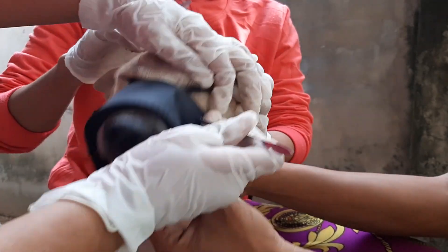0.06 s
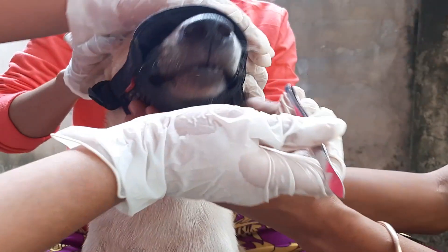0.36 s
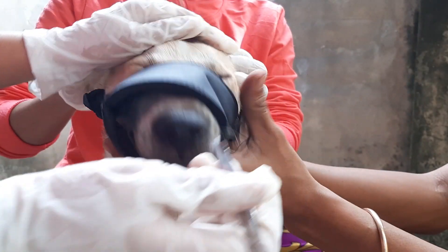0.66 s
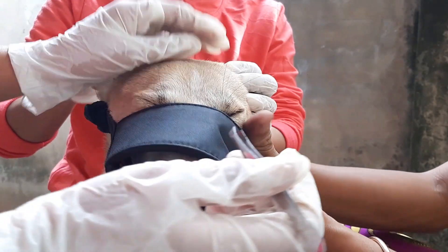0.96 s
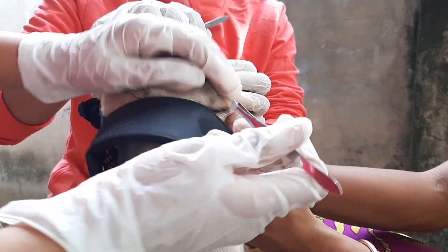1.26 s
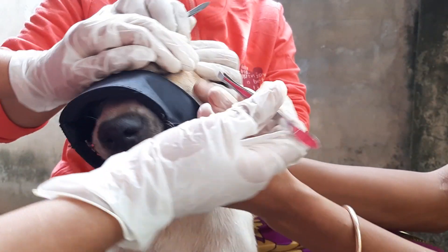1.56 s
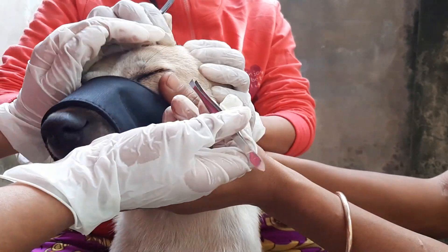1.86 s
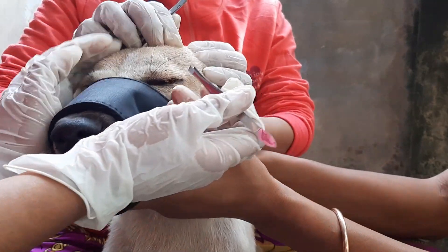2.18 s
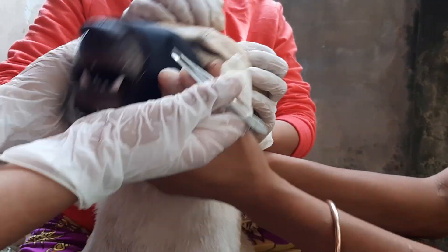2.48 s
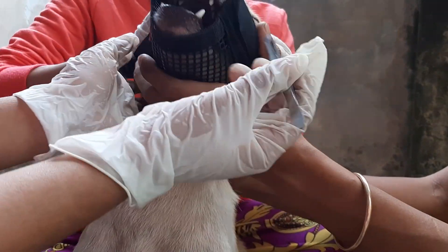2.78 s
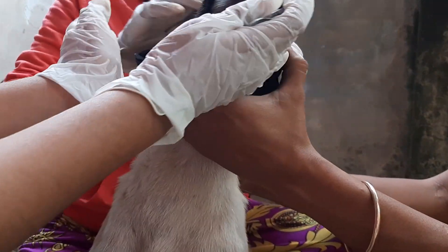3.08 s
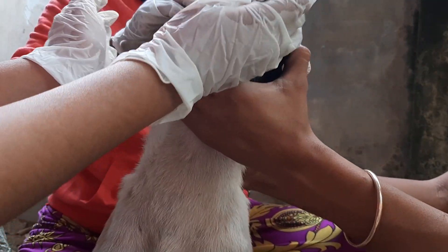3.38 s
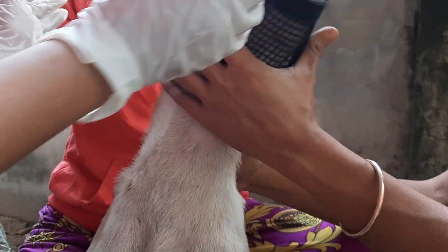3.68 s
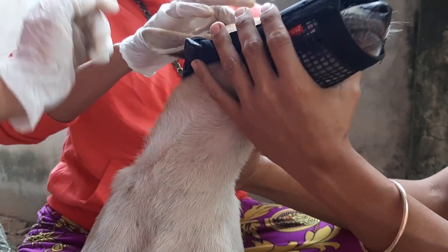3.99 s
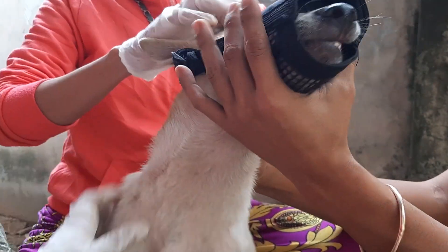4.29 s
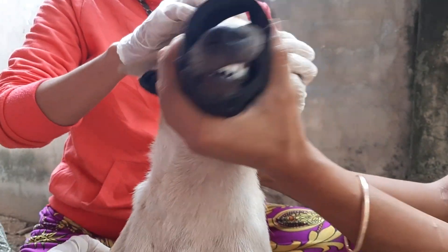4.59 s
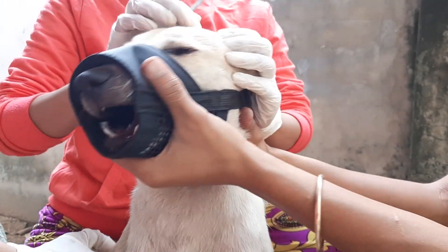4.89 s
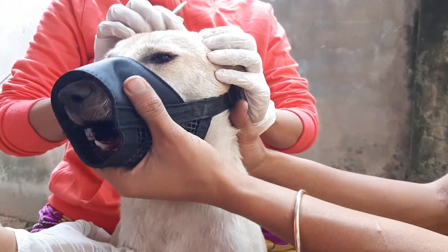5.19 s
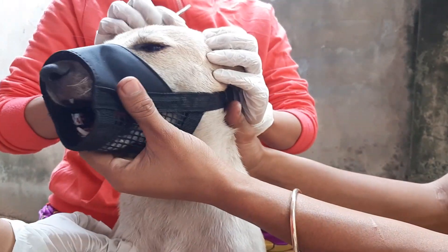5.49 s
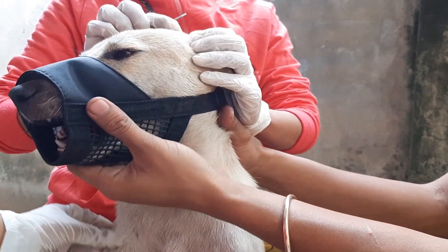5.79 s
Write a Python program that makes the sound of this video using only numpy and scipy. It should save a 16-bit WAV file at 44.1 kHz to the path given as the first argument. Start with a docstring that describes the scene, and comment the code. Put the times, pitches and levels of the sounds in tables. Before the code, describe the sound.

A muzzled dog is heard close up in a small, hard-walled room with a steady low hum. It starts with faint, thin, very high whistling whines and soft nose breaths, which build from about 1.3 seconds. At 1.9 seconds comes a loud, high yelp, followed by a gasp and a snort. Around 2.4 seconds a brief rough growl breaks into a second, lower yelp. Short snorts flutter inside the muzzle near 2.8 seconds. The whines return at 3.4 seconds among hissing breaths, peak near 4.3 and fade by 5, leaving a few last snorts and breaths until almost 6 seconds. Latex gloves rub on fur and mesh with a faint crackle at the start, around 2.5 to 3 seconds and near 4.5. A few tiny clicks of tweezers and muzzle are scattered throughout.

```python
"""A muzzled dog is held close to a phone in a small, hard-walled, humming room while gloved hands pick
ticks from its head. Gloves rub on fur and mesh, small clicks sound, and the dog whines in thin nasal
whistles. Its vocal folds yelp at 1.9 s, then break from a growl into a second, lower yelp at 2.4 s.
Gasps and snorts rush into the muzzle around the cries and after them. The whines return at 3.4 s,
peak near 4.3 s and give way to a few last snorts and breaths."""
import sys
import numpy as np
from scipy import signal
from scipy.fft import rfft, irfft, next_fast_len
from scipy.io import wavfile
from scipy.ndimage import uniform_filter1d

SR = 44100
rng = np.random.default_rng(int(sys.argv[2]) if len(sys.argv) > 2 else 0)


def generate_wav(sig):
    """Save sig (samples, or channels by samples) to the path in sys.argv[1] as 16-bit PCM at SR."""
    pcm = np.round(np.clip(np.atleast_2d(sig).T, -1, 1) * 32767).astype(np.int16)
    wavfile.write(sys.argv[1], SR, pcm)


N = 257984
TIME = np.arange(N) / SR
FREQS = np.fft.rfftfreq(N, 1 / SR)


def whine_arches(attack_s=0.017, release_s=0.012):
    """Whine pitch and strength: each scoops to its crest, then slides off as the air runs out."""
    # (start [s], length [s], crest position [0-1], start pitch [Hz], crest pitch [Hz], end pitch [Hz],
    #  bend [1 even slide, 4 late plunge], relative start level [dB], relative end level [dB])
    arches = [ (.115, 0.081, .26, 4930, 5760, 5610, 1.2, -47, -51.5),
              (.64, 0.071, 0.76, 5350, 5460, 5500, 2.4, -42, -40.5),
              (1.305, .085, .25, 5500, 5520, 5424, 1, -55, -61),
              (1.388, 0.15, 0.16, 5780, 5980, 5720, 1.27, -49.5, -36.5),
              (1.553, 0.13, .25, 5920, 5920, 5530, 1.3, -46.5, -31.5),
              (1.675, 0.062, 0.13, 5640, 5560, 5403, 1.53, -30, -17.5),
              (1.757, 0.12, 0.53, 5660, 5760, 5340, 1.2, -36.5, -30.5),
              (1.91, 0.068, 1, 5300, 5500, 5550, 1, -31.5, -40.5),
              (1.98, 0.15, .88, 5560, 5650, 5540, 3.1, -46.5, -38.5),
              (2.432, 0.026, 0.62, 5320, 5620, 5600, 2.4, -33, -31),
              (2.59, 0.032, 0.28, 5440, 5460, 5400, 1, -36, -44),
              (3.425, 0.058, 0.87, 5470, 5560, 5600, 1.04, -61, -30),
              (3.475, 0.13, 0.31, 5420, 5680, 5070, 2.4, -33, -28.5),
              (3.83, 0.049, 1, 5300, 5680, 5660, 1.7, -33.5, -35.5),
              (3.897, .065, 0.14, 5670, 5560, 5320, 0.96, -35, -43),
              (3.95, 0.096, .5, 5600, 5530, 5520, 1, -47, -41),
              (4.015, .318, 0.7, 5500, 5840, 5080, 4.8, -32.5, -21.5),
              (4.6, 0.061, .8, 5550, 5960, 6000, 1.8, -51, -41.5),
              (4.735, .115, .15, 6170, 6020, 5700, 1.5, -49.5, -52),
              (4.838, 0.12, 0.57, 5500, 5750, 5200, 1.6, -39, -40.5),
              (5.229, 0.031, 0.29, 3960, 4036, 3890, 1.16, -34.5, -39)]
    pitch_hz, strength = np.full(N, float(arches[0][3])), np.zeros(N)
    for start, length, share, start_hz, crest_hz, end_hz, bend, start_db, end_db in arches:
        crest, end = start + share * length, start + length
        scoop_hz = (start_hz - crest_hz) * (1 - progress(start, crest)) ** 2
        slide_hz = (end_hz - crest_hz) * progress(crest, end) ** bend
        pitch_hz = np.where(TIME >= start, crest_hz + scoop_hz + slide_hz, pitch_hz)
        swell = envelope(start, end, attack_s, release_s, end_db - start_db)
        strength += undb((start_db + end_db) / 2) * swell
    return uniform_filter1d(pitch_hz, size=200), strength


def whines(jitter=0.0017, waver=0.0014, squeak=0.02, flutter_db=1.5, octave_db=-32, gain_db=1):
    """A nearly pure whistle high in the nose; its faint octave grows with the root of its strength."""
    # breaks into a rough squeak: (start [s], length [s])
    breaks = [(1.829, 0.035), (2.438, .022)]
    hz, strength = whine_arches()
    broken = sum(envelope(s, s + length, attack_s=0.012, release_s=0.012) for s, length in breaks)
    detune = jitter * wander(120) + waver * wander(35) + squeak * broken * wander(400)
    phase = 2 * np.pi * np.cumsum(hz * (1 + detune)) / SR
    strength = np.sqrt(2) * strength * undb(gain_db + flutter_db * wander(60))
    whistle = place(strength * np.sin(phase), lead_ms=0.13, pan_db=4)
    octave = np.sqrt(strength) * undb(octave_db + wander(23)) * np.sin(2 * phase)
    return whistle + place(octave, lead_ms=0.14, pan_db=-5)


def yelps(jitter=0.0047, room_flutter_db=0.96, rasp_db=-22, core_gain_db=1, upper_gain_db=-3):
    """Taut vocal folds: two strong partials, overtones shaped by the throat, air on each cycle."""
    # each yelp, levels relative: (time [s], pitch [Hz], fundamental [dB], octave [dB], overtones [dB])
    high_yelp = [(1.862, 995, -29, -46, -62.5), (1.876, 939, -15, -24.5, -29.5),
                 (1.904, 830.5, -14, -17.5, -32.5), (1.936, 872, -9, -21, -39.5),
                 (1.948, 897, -15, -23.5, -36.5), (1.968, 904.2, -10, -24.5, -25.5),
                 (2.01, 887.4, -8, -26.5, -24), (2.03, 873, -13, -29.5, -35),
                 (2.056, 824.3, -11, -30, -43.5), (2.094, 840, -15.5, -30.5, -50.5),
                 (2.104, 835.4, -33.5, -49.5, -44), (2.116, 811, -16.5, -45, -52),
                 (2.128, 792, -34.5, -43.5, -44.5)]
    low_yelp = [(2.448, 539.4, -35.5, -23, -40), (2.462, 524, -26, -12.5, -49),
                (2.48, 499.8, -29.5, -16.5, -43.5), (2.516, 551.6, -26.5, -13.5, -46.5),
                (2.53, 570.7, -25.5, -32, -56), (2.554, 587.3, -21, -32, -47.5),
                (2.588, 596, -20.5, -50, -56.5), (2.602, 565, -32, -48, -68), (2.61, 521.3, -49, -32, -53)]
    # throat response: (frequency [Hz], gain [dB])
    throat = [(1500, 9), (2100, 14), (2700, 5), (3330, 11.5), (3600, -29), (4400, -10.5), (5400, -18.5),
              (6700, -25.5), (9000, -46), (15000, -58.5)]
    gate, hz, fundamental_db, octave_db, upper_db = phrases([high_yelp, low_yelp])
    hz = hz * (1 + jitter * wander(180))
    phase = 2 * np.pi * np.cumsum(hz) / SR
    core = undb(fundamental_db) * np.sin(phase) + undb(octave_db) * np.sin(2 * phase)
    overtones = sum(gain_at(k * hz, throat) * np.sin(k * phase) for k in range(3, 13))
    rasp = undb(rasp_db) * colour(rng.standard_normal(N) * (1 + np.cos(phase)), throat)
    upper = undb(upper_db + upper_gain_db) * (overtones + rasp)
    voice = place(undb(core_gain_db) * core, lead_ms=0.098, pan_db=2.8)
    voice += place(upper, lead_ms=0.14, pan_db=-2.5)
    # random level flutter stands for beating against the room's reflections
    return np.sqrt(2) * gate * undb(room_flutter_db * wander(35)) * voice


def growl(pulse_hz=155, unevenness=0.16, air_ratio=0.66, catch_s=0.0072, gain_db=19):
    """Slack folds catch a few times, then flap chaotically; each slap rings the throat."""
    # flapping of the folds: (time [s], relative level [dB])
    flapping = [(2.383, -32), (2.389, -28), (2.453, -28.5), (2.475, -58)]
    # single catches: (time [s], relative energy [dB])
    catches = [(2.334, -17), (2.341, -10), (2.371, -10.5), (2.374, -21.5), (2.384, -1.5)]
    # throat resonances: (centre [Hz], width [Hz], gain [dB])
    modes = [(145, 47, -3), (592, 74, 9), (910, 195, 4.5), (1250, 150, 1.5), (1684, 73, 3), (2013, 44, 4.5),
             (2660, 510, -22), (2900, 380, -9)]
    gate, level_db = phrases([flapping])
    cycles = np.cumsum(pulse_hz * np.exp(unevenness * wander(202))) / SR
    slaps = np.diff(np.floor(cycles), prepend=0)
    puffs = np.exp(-(cycles % 1) / 1.05) * rng.standard_normal(N)  # air escapes after each slap
    drive = unit(unit(slaps) + air_ratio * unit(puffs)) * gate * undb(level_db + gain_db)
    for s, energy_db in catches:
        push = np.exp(-(2 * (TIME - s) / catch_s) ** 2) * rng.standard_normal(N)
        drive += undb(energy_db + gain_db) * push / np.sqrt(np.sum(push ** 2))
    voice = sum((-1) ** k * undb(db) * resonate(drive, hz, width_hz)
                for k, (hz, width_hz, db) in enumerate(modes))
    voice = signal.sosfilt(signal.butter(2, 380, "highpass", fs=SR, output="sos"), voice)
    return signal.sosfilt(signal.butter(6, 3100, fs=SR, output="sos"), voice)


def nose(rest_db=-70.5, flutter_db=1.85, gain_db=1):
    """Air forced through the nose hisses in pushes over a thin resting flow."""
    # pushes, levels relative: (start [s], end [s], low hiss [dB], high hiss [dB], growth [dB])
    pushes = [(-0.004, 0.264, -59, -61.5, -9), (0.273, 0.515, -65.5, -71, -7), (0.546, .78, -58.5, -61, -8),
              (.74, 0.937, -68, -73, -27), (1.033, 1.447, -59, -70, 7), (1.39, 1.875, -45.5, -50, 7.5),
              (1.893, 2.15, -50.5, -47.5, 6.5), (2.191, 2.344, -57, -60, -5),
              (2.4, 2.622, -43.5, -54.5, -12.5), (2.796, 3.04, -65.5, -64, -20),
              (3.383, 3.628, -49, -50.5, -4), (3.786, 4.361, -48, -54, 10.5), (4.357, 5.006, -55, -55, 4.5),
              (4.966, 5.354, -68, -67, 11), (5.372, 5.572, -64, -67, -3), (5.705, 5.876, -64.5, -62, -4)]
    # resonances of the nose's wide and narrow parts: (centre [Hz], width [Hz], gain [dB])
    wide_modes = [(2970, 1300, -10.5), (3180, 330, -2.5), (4120, 690, 1.5), (4588, 1200, 5),
                  (5220, 370, 2.5)]
    narrow_modes = [(7154, 1500, 2.5), (7930, 900, -7.5), (11440, 2100, -11), (14200, 5600, -6.5)]
    low = high = undb(rest_db)
    for start, end, low_db, high_db, growth_db in pushes:
        flow = envelope(start, end, attack_s=0.1, release_s=0.057, growth_db=growth_db)
        low = low + flow * undb(low_db + gain_db)
        high = high + flow * undb(high_db + gain_db)
    return (low * hiss(wide_modes) + high * hiss(narrow_modes)) * undb(flutter_db * wander(45))


def snorts(flutter_db=1.0, gain_db=3):
    """Short blasts of air flutter the lips inside the muzzle."""
    # blasts: (start [s], length [s], relative level [dB])
    blasts = [(1.688, 0.38, -50), (2.108, 0.045, -37), (2.159, .15, -50.5), (2.79, 0.026, -50),
              (2.838, .09, -51.5), (2.937, 0.085, -55.5), (3.052, 0.062, -68), (3.371, 0.043, -49),
              (3.406, 0.24, -57), (3.654, 0.072, -53), (3.782, 0.183, -54), (5.168, .06, -45.5),
              (5.224, .095, -42.5), (5.627, 0.04, -44.5)]
    # snort spectrum: (frequency [Hz], gain [dB])
    spectrum = [(250, -18.5), (570, -6), (950, -10), (1300, 0.5), (1650, -4), (2300, -5.5), (3200, -7.5),
                (4500, -15), (7000, -29.5), (10000, -35)]
    flow = sum(undb(db) * envelope(s, s + length, attack_s=0.005, release_s=0.02, growth_db=-1.5)
               for s, length, db in blasts)
    return flow * undb(gain_db + flutter_db * wander(160)) * colour(noise_pair(0.65), spectrum)


def gasps():
    """Air rushing through the muzzle swells and fades in one resonance."""
    # breaths: (start [s], end [s], resonance [Hz], width [Hz], level [dB])
    breaths = [(2.156, 2.307, 4423, 770, -44), (3.388, 3.52, 3540, 712, -48.5),
               (3.65, 3.725, 3690, 1200, -52.5), (3.78, 3.922, 3350, 800, -51),
               (4.328, 4.633, 2810, 746, -49.5)]
    out = np.zeros((2, N))
    for start, end, hz, width_hz, db in breaths:
        swell = np.sqrt(np.abs(np.sin(np.pi * progress(start, end))))
        out += undb(db) * swell * hiss([(hz, width_hz, 0)])
    return out


def gloves(slip_db=5.5, gain_db=1):
    """Latex sticks and slips over hairs in a fine crackle; each stroke eases off."""
    # strokes on fur and mesh: (start [s], length [s], relative level [dB])
    strokes = [(0.109, 0.13, -53), (0.558, .055, -54), (0.633, .16, -62), (2.525, 0.13, -49),
               (2.83, 0.19, -56), (4.335, 0.096, -49), (4.41, 0.28, -49.5), (4.658, 0.14, -65)]
    # friction spectrum: (frequency [Hz], gain [dB])
    spectrum = [(1000, 1.5), (3300, -0.5), (5500, 7), (8000, 0), (9400, -4), (12000, -0.5), (15500, 2.5)]
    pressure = sum(undb(db) * envelope(s, s + length, attack_s=0.024, release_s=0.023, growth_db=-9.5)
                   for s, length, db in strokes)
    crackle = noise_pair(0.067) * undb(slip_db * wander(1200))
    return pressure * undb(gain_db) * colour(crackle, spectrum)


def clicks(decay_s=0.0033, relative_width=0.92):
    """Tiny hard contacts of tweezers and muzzle, each a heavily damped ring."""
    # contacts: (time [s], peak [dB], centre [Hz])
    contacts = [(.359, -41.5, 1070), (.545, -42, 8100), (2.548, -26.5, 8000), (2.875, -29.5, 1630),
                (3.223, -43, 7980), (4.417, -31.5, 2800), (5.274, -31, 1240)]
    out = np.zeros(N)
    age = np.arange(SR // 20) / SR
    for s, peak_db, hz in contacts:
        crack = rng.standard_normal(len(age)) * np.exp(-age / decay_s)
        width_hz = hz * relative_width
        ring = resonate(resonate(crack, hz, width_hz), hz, width_hz)
        start = int(s * SR)
        out[start:start + len(age)] += undb(peak_db) * ring / np.abs(ring).max()
    return out


def room(x, t60_s=0.45, build_s=0.023, tail_db=-17, damp_hz=3500):
    """Floor and walls answer at once, then a short dull tail dies away."""
    # near reflections: (left delay [s], right delay [s], gain before damping [dB])
    echoes = [(.0052, .0058, -15), (0.0129, 0.013, -9), (.021, .0225, -14)]
    age = np.arange(SR // 2) / SR
    decay = np.exp(-np.log(1000) * age / t60_s) * np.minimum(age / build_s, 1)
    response = rng.standard_normal((2, len(age))) * decay
    response *= undb(tail_db) / np.sqrt(np.sum(response ** 2) / 2)
    for left_s, right_s, db in echoes:
        response[0, int(left_s * SR)] += undb(db)
        response[1, int(right_s * SR)] += undb(db)
    response = signal.lfilter(*signal.butter(1, damp_hz, fs=SR), response)
    return x + signal.fftconvolve(x, response, axes=1)[:, :N]


def background(hum_waver_db=0.5, air_db=-57, air_waver_db=2.4):
    """A low wavering hum, alike in both channels, under faint room air."""
    # room hum: (time [s], level [dB])
    hum_levels = [(0, -49.5), (1.2, -49.5), (2.8, -53), (4.2, -50.5), (5.85, -53)]
    # hum and air spectra: (frequency [Hz], gain [dB])
    hum_spectrum = [(15, -79), (25, -32), (37, -21), (59, -9.5), (80, -10.5), (103, -6), (129, 1.5),
                    (200, -12), (261, -18), (292, -10), (356, -10.5), (425, -21), (500, -25), (650, -66.5),
                    (1100, -120)]
    air_spectrum = [(250, -14.5), (450, -3.5), (800, -4), (1500, -11), (3000, -16), (6000, -25),
                    (10000, -29.5), (15500, -43.5)]
    hum_db, = curves(hum_levels)
    hum = undb(hum_db + hum_waver_db * wander(7)) * colour(noise_pair(0.98), hum_spectrum)
    air = undb(air_db + air_waver_db * wander(2.8)) * colour(noise_pair(0.34), air_spectrum)
    return hum + air


def undb(db):
    """Decibels to gain."""
    return 10 ** (np.asarray(db) / 20)


def unit(x):
    """Scale to rms 1."""
    return x / np.sqrt(np.mean(x ** 2))


def curves(rows):
    """Each column after time, interpolated per sample."""
    s, *columns = np.transpose(rows)
    return [np.interp(TIME, s, c) for c in columns]


def phrases(tables):
    """A soft gate open during the tables, then their curves."""
    gate = sum((TIME >= rows[0][0]) & (TIME < rows[-1][0]) for rows in tables) > 0
    return [uniform_filter1d(gate * 1., size=200)] + curves(np.vstack(tables))


def progress(start, end):
    """Ramp from 0 at start to 1 at end."""
    return np.clip((TIME - start) / max(end - start, .001), 0, 1)


def envelope(start, end, attack_s, release_s, growth_db=0):
    """Attack, a hold that grows or sags evenly, release."""
    out, during = np.zeros(N), (TIME > start) & (TIME < end)
    t = TIME[during]
    edges = np.minimum((t - start) / attack_s, 1) * np.minimum((end - t) / release_s, 1)
    out[during] = edges * undb(growth_db * ((t - start) / (end - start) - .5))
    return out


def gain_at(hz, spectrum):
    """Gain of a (frequency [Hz], gain [dB]) spectrum at hz."""
    points_hz, db = np.transpose(spectrum)
    return undb(np.interp(np.log(hz + 1), np.log(points_hz), db))


def colour(x, spectrum):
    """Filter by a spectrum that falls away beyond its ends; rms 1."""
    low_skirt = np.minimum(FREQS / spectrum[0][0], 1) ** 2
    high_skirt = np.minimum(spectrum[-1][0] / (FREQS + 1), 1) ** 2
    return unit(irfft(rfft(x) * gain_at(FREQS, spectrum) * low_skirt * high_skirt, N))


def noise_pair(correlation):
    """Stereo white noise, partly shared."""
    mid, side = rng.standard_normal((2, N))
    sides = np.array([side, -side])
    return (np.sqrt(1 + correlation) * mid + np.sqrt(1 - correlation) * sides) / np.sqrt(2)


def wander(hz):
    """Smooth random drift up to about hz; rms 1."""
    size = next_fast_len(N, real=True)
    lowpass = np.exp(-(np.fft.rfftfreq(size, 1 / SR) / hz) ** 2)
    return unit(irfft(rfft(rng.standard_normal(size)) * lowpass, size)[:N])


def resonate(x, hz, width_hz):
    """One resonance, gain 1 at its centre."""
    return signal.lfilter(*signal.iirpeak(hz, hz / width_hz, fs=SR), x)


def hiss(modes):
    """Turbulent air through steep resonances; rms 1."""
    air = noise_pair(0.3)
    return unit(sum(undb(db) * resonate(resonate(air, hz, width_hz), hz, width_hz)
                    for hz, width_hz, db in modes))


def place(x, lead_ms, pan_db):
    """Stereo position: left leads by lead_ms; pan_db is left minus right."""
    left, right = np.broadcast_to(x, (2, N))
    late = irfft(rfft(right) * np.exp(-2j * np.pi * FREQS * lead_ms / 1000), N)
    return np.array([left * undb(pan_db / 2), late * undb(-pan_db / 2)])


def scene():
    """The dog sits a little to the left and turns its head; the hands work around it."""
    # pan of the nose as the head turns: (time [s], left minus right [dB])
    head_turns = [(.7, 4), (1.45, 3.5), (1.72, 4.5), (2.05, 7.5), (2.6, 5.5), (3.5, -0.5), (4.0, -6),
                  (4.22, 2), (4.33, -3.5), (4.9, 2.5)]
    turn_db, = curves(head_turns)
    cries = yelps() + place(growl(), lead_ms=0.14, pan_db=2.5)
    breath = place(snorts() + gasps(), lead_ms=0.15, pan_db=1.0)
    nasal = whines() + place(nose(), lead_ms=0.16, pan_db=-0.5)
    nasal *= undb(np.array([turn_db, -turn_db]) / 2)
    hands = place(gloves() + clicks(), lead_ms=0.039, pan_db=0.5)
    return room(cries + breath + nasal + hands) + background()


def record(dry):
    """The phone cuts the top treble steeply."""
    cutoff_hz = 15750
    return signal.sosfilt(signal.ellip(10, .2, 70, cutoff_hz, fs=SR, output="sos"), dry)


dry = scene()
out = record(dry)
generate_wav(out)
```